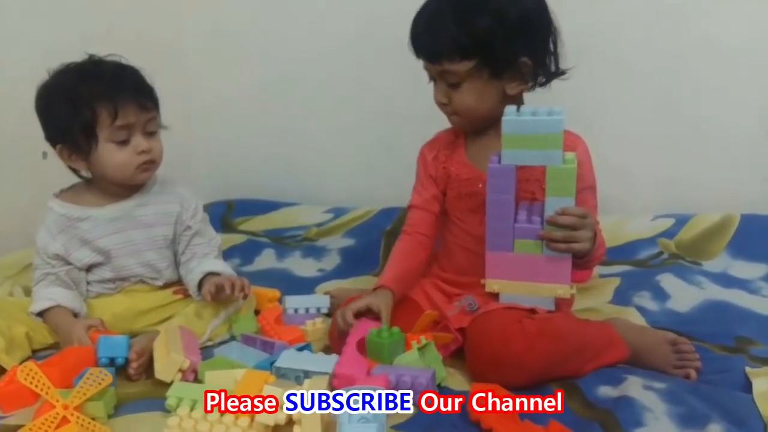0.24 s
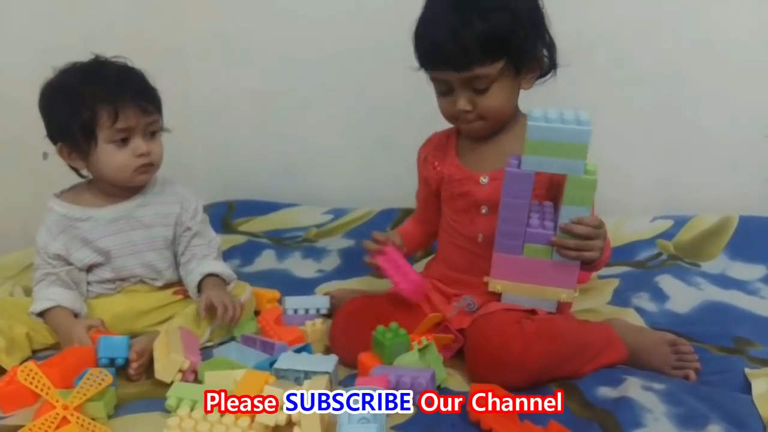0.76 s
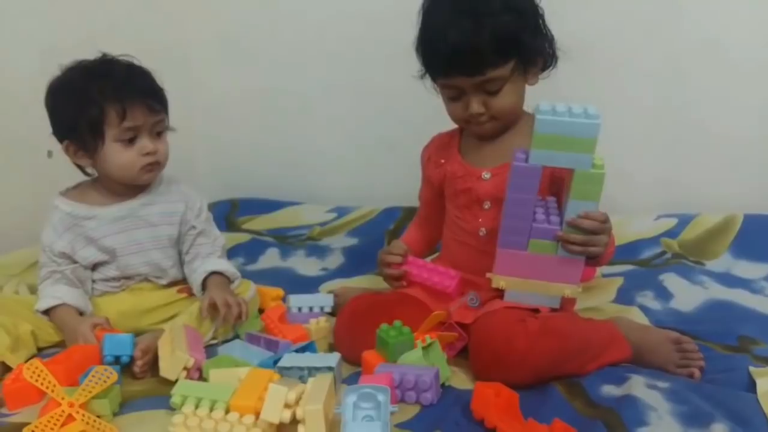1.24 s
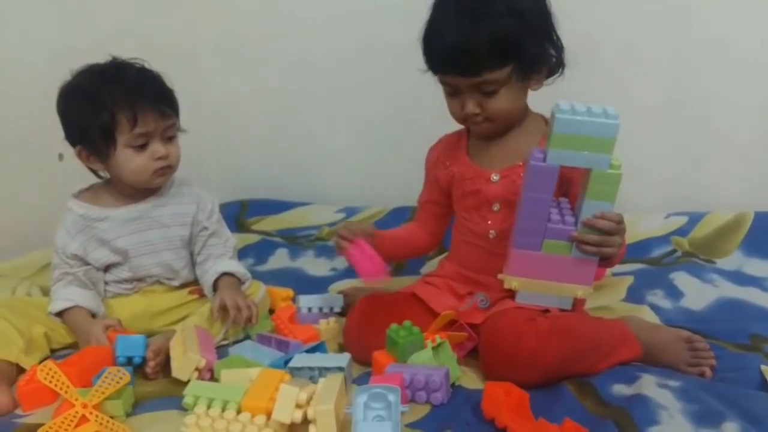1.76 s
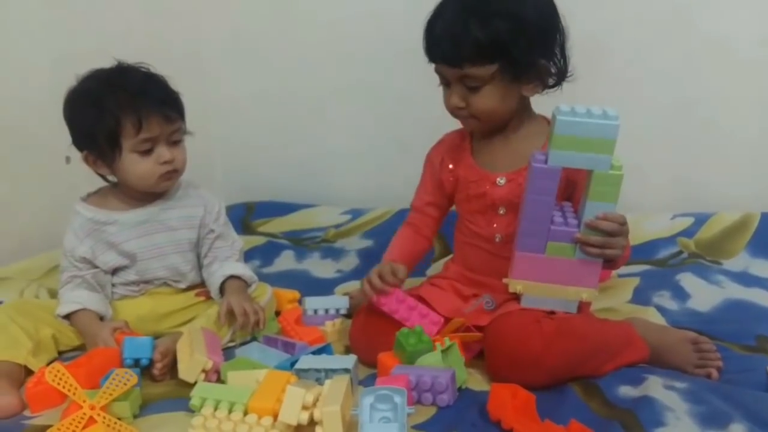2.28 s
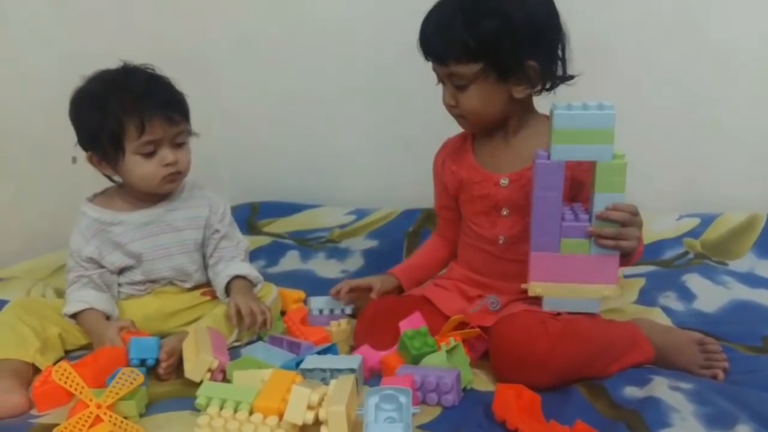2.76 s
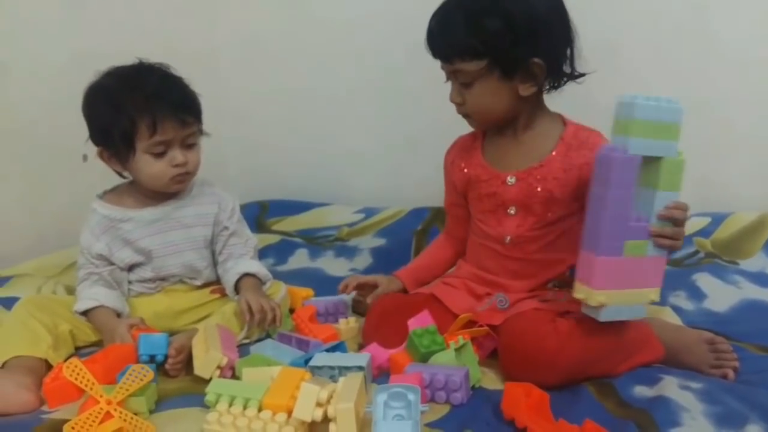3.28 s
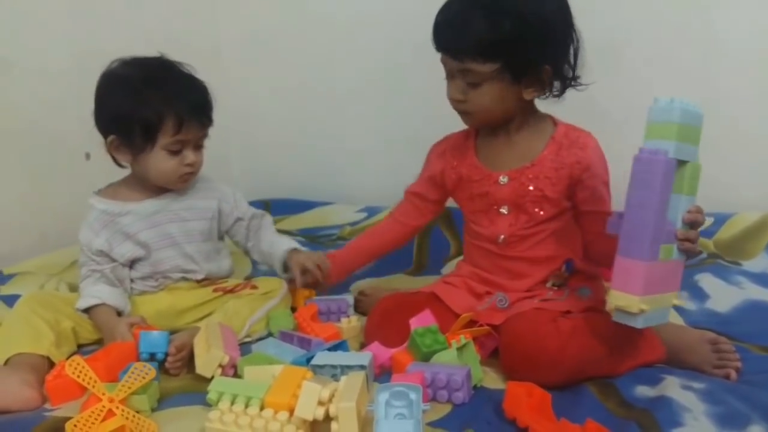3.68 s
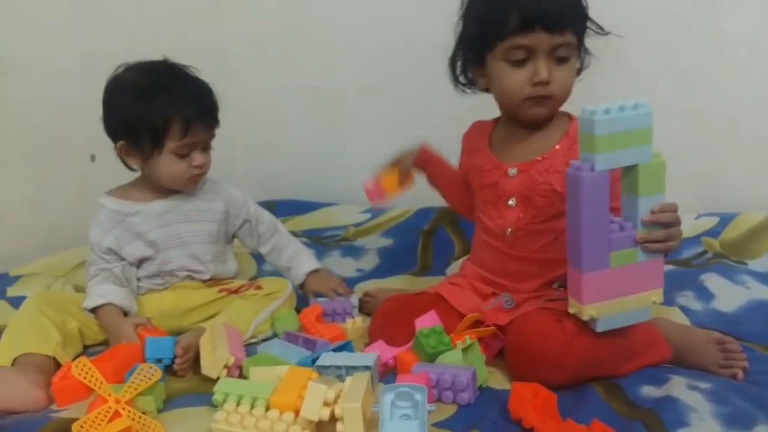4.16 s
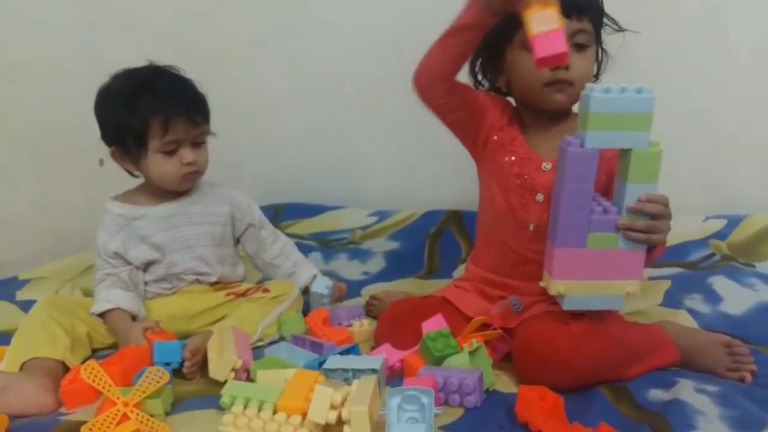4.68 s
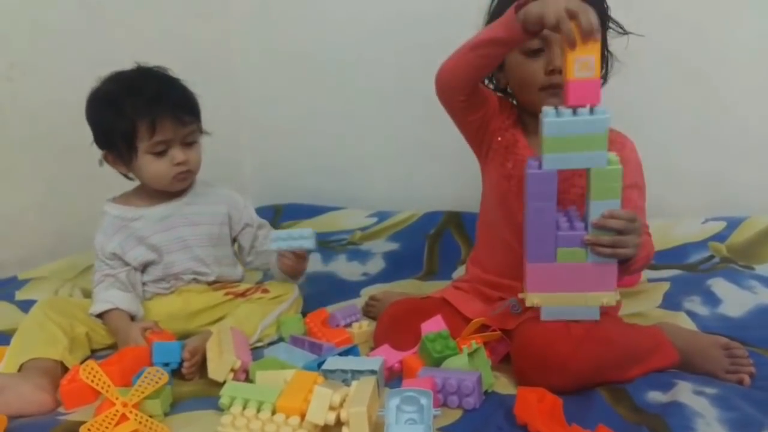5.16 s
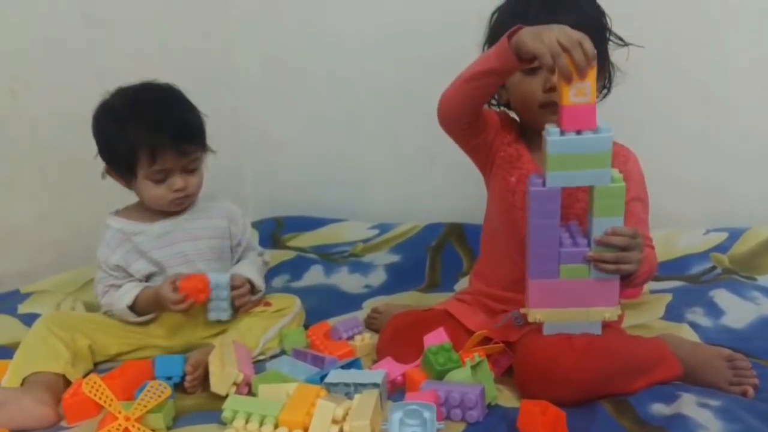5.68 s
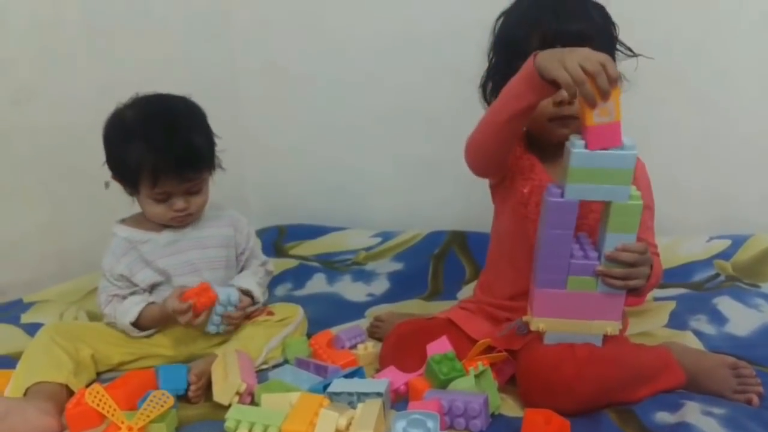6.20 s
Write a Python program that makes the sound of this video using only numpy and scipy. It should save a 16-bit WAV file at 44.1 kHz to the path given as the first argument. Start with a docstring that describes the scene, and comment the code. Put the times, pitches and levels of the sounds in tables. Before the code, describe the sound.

Large hollow toy bricks are handled on a bedspread. Light rattling grows into a dense, bright clatter, then one double clack, near silence with faint cloth, a strong hollow knock with low thud, scattered small clicks, a quieter lull, a sharp brick clack, and several snapping presses on a tower. The microphone is near; hard walls add a short bright tail over quiet room rumble and faint hiss.

```python
"""A low rumble, faint hiss and barely moving cloth come first; then a loose plastic block rattles.
A child handles large hollow blocks on a bed in a small, bare-walled room: an arch is dragged out
of the pile and dropped back, loose pieces clack, and a brick is pressed onto a tower.
Knocks and scrapes ring the blocks' walls, shaped noise makes rubbing cloth and sliding plastic,
and low, damped swings make the mattress thuds. Echoes and a fading tail add the room."""
import sys
import numpy as np
from scipy import signal
from scipy.fft import rfft, irfft
from scipy.io import wavfile

SR = 44100
rng = np.random.default_rng(int(sys.argv[2]) if len(sys.argv) > 2 else 0)


def generate_wav(sig):
    """Save sig (samples, or channels by samples) to the path in sys.argv[1] as 16-bit PCM at SR."""
    pcm = np.round(np.clip(np.atleast_2d(sig).T, -1, 1) * 32767).astype(np.int16)
    wavfile.write(sys.argv[1], SR, pcm)


N = 283563


def amp(db):
    """Turns decibels into a gain."""
    return 10 ** (np.asarray(db) / 20)


def unit(x):
    """Scales a signal to rms 1."""
    return x / np.sqrt(np.mean(x ** 2) + 1e-20)


def read(points, hz):
    """Reads a curve between its points, on a log-frequency axis."""
    f, value = np.transpose(points)
    return np.interp(np.log(hz + 1), np.log(f + 1), value)


def add(mix, s, sound):
    """Mixes a sound in at time s."""
    part = mix[:, max(round(s * SR), 0):][:, :sound.shape[-1]]
    part += sound[..., :part.shape[-1]]


# How alike left and right are in sound from all around: [f/Hz, likeness from 0 to 1]
LIKENESS = [(30, 0.54), (100, 1), (250, 0.52), (600, 0.42), (1200, 0), (2500, 0), (9000, 0)]


def matched(a, b, hz):
    """Blends two unrelated spectra so that long waves reach left and right more alike."""
    same = np.clip(read(LIKENESS, hz), -1, 1).reshape((-1,) + (1,) * (a.ndim - 1))
    return np.array([a, same * a + np.sqrt(1 - same ** 2) * b])


def coloured(pair, colour):
    """Gives two unrelated signals a tone colour and the likeness of sound from all around; rms 1."""
    hz = np.fft.rfftfreq(N, 1 / SR)
    left, right = rfft(pair)
    return unit(irfft(matched(left, right, hz) * amp(read(colour, hz)), N))


def slips(per_s, spread_db):
    """Makes tiny clicks of very uneven size, as surfaces stick and slip."""
    size = amp(spread_db * np.minimum(rng.exponential(1, N), 4))
    happens = rng.random(N) < per_s / SR
    return size * happens * rng.standard_normal((2, N))


def lumps(per_s, depth_db):
    """Makes a gain that wanders up and down as contacts come and go."""
    knots = np.arange(0, N + SR, SR / per_s)
    heights = np.clip(rng.standard_normal(len(knots)), -2, 2)
    return amp(depth_db * np.interp(np.arange(N), knots, heights))


def strokes(rows, rise_s, fall_s):
    """Adds up the gains of gestures; each swells, holds and fades."""
    t = np.arange(N) / SR
    total = np.zeros(N)
    for start, length, db in rows:
        before = np.maximum((start - t) / rise_s, 0)
        after = np.maximum((t - start - length) / fall_s, 0)
        total += amp(db - 20 * before - 20 * after)
    return total


# Tone colour of the hiss: [f/Hz, relative level/dB per Hz]
AIR_COLOUR = [(100, -22), (200, -6.5), (320, -8), (800, -11.5), (1200, -12.5), (1700, -14), (2300, -11),
              (3200, -37.5), (4000, -29), (5200, -48), (6400, -27), (9000, -38), (13000, -31), (15000, -41)]
# Tone colour of the rumble: [f/Hz, relative level/dB per Hz]
RUMBLE_COLOUR = [(20, -23), (30, -16), (45, -11.5), (60, -7.5), (85, 0.5), (130, 2), (200, -10), (300, -17),
                 (600, -45.5)]
AIR_DB, RUMBLE_DB = -68.5, -65  # rms before the microphone


def background():
    """Shaped noise makes a low, very slightly wavering rumble and a faint hiss."""
    rumble = coloured(rng.standard_normal((2, N)), RUMBLE_COLOUR)
    rumble *= amp(RUMBLE_DB) * lumps(per_s=8.4, depth_db=0.1)
    hiss = amp(AIR_DB) * coloured(rng.standard_normal((2, N)), AIR_COLOUR)
    return rumble + hiss


# Sleeves brush the blanket: [start t/s, length t/s, level/dB before the 8 dB cut in cloth()]
SLEEVES = [(.85, 0.14, -67.5), (1.52, 0.071, -59.5), (2.55, 0.4, -65), (4.01, 0.17, -69), (5.1, 2.6, -68)]
# Tone colour of rubbing cloth: [f/Hz, relative level/dB per Hz]
CLOTH_COLOUR = [(150, -8.5), (600, -3.5), (1500, 5.5), (2400, -1.5), (3400, -4), (4800, -29), (7000, -26),
                (13000, -51)]
SLEEVE_RISE_S, SLEEVE_FALL_S = 0.18, 0.049  # time to swell or fade by 20 dB
FIDGET_DB = -76.5  # cloth is never quite still


def cloth():
    """Fine grains of fabric rub in uneven strokes."""
    effort = amp(FIDGET_DB) + amp(-8) * strokes(SLEEVES, SLEEVE_RISE_S, SLEEVE_FALL_S)
    grains = lumps(per_s=29, depth_db=5.0) * slips(per_s=3000, spread_db=2.5)
    return effort * coloured(grains, CLOTH_COLOUR)


# Echoes from near walls: [delay t/s, gain; minus flips the wave]
ECHOES = [(.0031, -0.18), (.0058, 0.23), (.0092, 0.08), (0.014, 0.27), (0.0197, -0.2), (.027, 0.03)]
# Time for the room tail to fade by 60 dB: [f/Hz, fade t/s]
ROOM_FADE = [(120, 0.28), (400, 0.27), (1000, 0.42), (2200, 0.47), (5000, 0.52), (11000, 0.47)]
# Tone colour at the start of the tail: [f/Hz, relative level/dB]
ROOM_LEVEL = [(100, -22.5), (400, 0.5), (650, 3.5), (1200, -2.5), (2200, 0), (5000, 2), (11000, 3)]
ROOM_BUILD_S = .006  # time constant of the tail's build-up


def room(x, wet_db=0.23, count=3):
    """Near walls echo first, then scattered sound forms a tail that changes slowly over time."""
    out = np.zeros((2, N))
    for s, gain in ECHOES:
        add(out, s, gain * x)
    for k in range(count):
        # sparse random clicks stand for many scattered reflections
        taps = rng.choice([-1., 1.], (2, SR)) * (rng.random((2, SR)) < 4000 / SR)
        hz, t, z = signal.stft(taps, SR, nperseg=256)
        z = matched(z[0], z[1], hz)
        level_db = read(ROOM_LEVEL, hz)[:, None] - 60 * t / read(ROOM_FADE, hz)[:, None]
        tail = signal.istft(z * amp(level_db), SR, nperseg=256)[1]
        tail *= 1 - np.exp(-np.arange(tail.shape[1]) / SR / ROOM_BUILD_S)
        tail /= np.linalg.norm(tail, axis=1, keepdims=True)
        # each tail takes its turn; together their power stays even
        share = np.cos(np.pi * (np.arange(N) / SR + k / count)) * np.sqrt(2 / count)
        out += amp(wet_db) * signal.fftconvolve(x * share, tail, axes=1)[:, :N]
    return out


# Ringing tones of each piece or part that is struck, by name: [f/Hz, width f/Hz, level/dB].
# "edge" is a thin wall that catches, "snap" a dead click between gripped parts,
# "seat" a brick bottoming on its studs.
PIECES = { "arch": [(1293, 76, -2), (1570, 73, -0.5), (2270, 70, 3.5), (3320, 88, -15), (3790, 66, -12.5),
          (4300, 89, -11)], "pile": [(132, 42, -9), (246, 92, -3.5), (590, 210, 2.5), (895, 170, -5),
          (1425, 230, 4.5), (2110, 320, -10), (2730, 120, -14)], "loose": [(960, 170, -1), (1500, 200, 6.5),
          (1610, 550, 1.5), (2134, 215, -7), (3450, 230, -13)], "small": [(1574, 110, 1.5),
          (1647, 110, -0.5), (2283, 86, -4), (3435, 180, -14)], "brick": [(1150, 83, -10), (1502, 38, -2),
          (1690, 50, 4), (1771, 35, 4.5), (2042, 88, 0.5), (2338, 37, -1.5), (2620, 90, -11),
          (2874, 77, -9.5), (3560, 230, -22)], "hollow": [(228, 30, -9), (370, 60, -11), (467, 42, 1),
          (560, 32, 3), (700, 60, -16), (846, 35, -2), (937, 35, -7), (1033, 40, -3), (1362, 50, -5),
          (1723, 35, -9)], "rim": [(1390, 300, -13), (2140, 80, -6), (2324, 76, -5.5), (2530, 31, -8.5),
          (2820, 44, -15), (3240, 90, -12.5), (3660, 200, -22), (11160, 1200, -9)],
          "flat": [(1100, 410, -5.5), (1495, 330, 1.5), (1720, 330, 3), (2200, 220, 0.5), (3550, 500, -17)],
          "edge": [(1450, 260, -11), (1880, 180, -1), (2080, 120, 1), (2377, 116, -0.5), (3930, 300, -9)],
          "snap": [(1150, 300, -16.5), (1760, 350, 3), (2470, 350, -13)], "seat": [(1190, 65, -7),
          (1878, 61, 8.5), (2245, 68, 3), (2493, 45, 0.5), (2956, 84, -2.5), (3790, 81, -8),
          (4100, 100, -14)], "stud": [(2330, 230, -6.5), (3730, 260, -8), (3990, 290, -1)],
          "tower": [(2050, 160, 6.5), (2100, 46, 1), (2325, 120, 5.5), (2880, 112, -6), (3330, 180, -7.5),
          (5100, 220, -39)]}
# How the force of a knock is spread over pitch: [f/Hz, level/dB]
CONTACT = [(40, -15.5), (110, 3.5), (300, -1), (1500, 2.5), (2400, 2.5), (3200, 0), (4200, -7),
           (5400, -13.5), (7000, -13), (10800, -32.5), (12500, -46), (15000, -70.5)]
# Share of a knock that comes from edges chattering: [f/Hz, level/dB]
CHATTER = [(100, -10), (1000, -5.5), (2400, -2.5), (3300, -0.5), (4500, -0.5), (14000, -0.5)]
# Extra delay at the right microphone port, by piece: [delay t/ms]
RIGHT_LATE_MS = {"arch": 0.029, "pile": 0.054, "loose": 0.14, "small": 0.11, "brick": 0.097, "hollow":
                 0.024, "rim": 0.037, "flat": 0.13, "stud": 0.031, "tower": 0.17, "edge": 0.048, "snap":
                 0.059, "seat": 0.15}


def knock(piece, peak_db, factor, bright_db, pan_db, skirt=1.27, shell_db=-29, chatter_s=0.006,
          size=8192):
    """A brief contact rings the walls of one hollow piece, with its own level and brightness."""
    hz = np.maximum(np.fft.rfftfreq(size, 1 / SR), 1)
    t = np.arange(size) / SR
    power = amp(shell_db) ** 2  # a faint even floor under the ringing tones
    for f, width, db in PIECES[piece]:
        off_pitch = (hz - (f * factor) ** 2 / hz) / width
        power = power + amp(db) ** 2 / (1 + off_pitch ** 2) ** skirt
    octaves = np.log2(np.clip(hz, 300, 5000) / 2000)
    gain = np.sqrt(power) * amp(read(CONTACT, hz) + bright_db * octaves)
    # this phase puts the energy first: sharp start, dying tail
    log_gain = np.log(np.r_[gain, gain[-2:0:-1]] + 1e-6)
    ring = np.exp(np.conj(signal.hilbert(log_gain)))[:len(hz)]
    # the peak is set before chatter, left-right balance, room and microphone
    ring *= amp(peak_db) / abs(signal.hilbert(irfft(ring))).max()
    # the edges chatter for a few milliseconds, which spreads the treble out in time
    chatter = rng.standard_normal((2, size)) * np.exp(-t / chatter_s)
    chatter = rfft(chatter / np.linalg.norm(chatter, axis=1, keepdims=True))
    share = np.clip(amp(read(CHATTER, hz)), 0, 1)
    delay = np.array([[0], [RIGHT_LATE_MS[piece]]]) / 1000
    clean = np.sqrt(1 - share ** 2) * np.exp(-2j * np.pi * hz * delay)
    sound = irfft(ring * (clean + share * chatter))[:, :size // 2]
    return sound * amp([[pan_db / 2], [-pan_db / 2]])


# A jostled piece rattles in a quick run of contacts:
# [start t/s, length t/s, piece, first level/dB before chance, pitch factor, brightness/dB per octave]
RATTLES = [(0.048, 0.098, "loose", -47.5, 0.94, -5), (0.233, 0.064, "loose", -44.5, 0.74, -1),
           (2.136, 0.052, "flat", -38, 1.67, 1), (4.415, 0.061, "flat", -39, 1.1, 1.5),
           (4.8, 0.05, "stud", -40.5, 0.82, -1.5)]
RATTLE_FADE_DB, RATTLE_SPREAD_DB = -4, 4  # fade over a full run, chance in each contact
RATTLE_DETUNE, RATTLE_PAN_DB = 0.033, 8.5  # each contact lands on another spot of the piece


def rattles(count=4, jitter=.25):
    """Each rattle is a few unevenly spaced contacts that tend to grow weaker."""
    out = np.zeros((2, N))
    for start, length, piece, peak_db, factor, bright_db in RATTLES:
        for k in range(count):
            late, force, spot, side = np.clip(rng.standard_normal(4), -1.5, 1.5)
            along = (k + jitter * late * (k > 0)) / count
            db = peak_db + RATTLE_FADE_DB * along + RATTLE_SPREAD_DB * force
            pitch = factor * (1 + RATTLE_DETUNE * spot)
            add(out, start + length * along, knock(piece, db, pitch, bright_db, RATTLE_PAN_DB * side))
    return out


# Weight shifts on the bedding: [start t/s, length t/s, level/dB]
SHIFTS = [(.1, 0.55, -67), (1.25, 0.32, -71), (1.85, 0.41, -65), (2.4, 0.33, -64), (2.71, 0.038, -61),
          (3.16, 0.08, -62), (4.4, 0.57, -71), (5.11, 0.085, -58), (5.73, 0.014, -56.5), (5.9, 0.44, -65.5)]
# Tone colour of the bedding: [f/Hz, relative level/dB per Hz]
SHIFT_COLOUR = [(40, -20), (90, 5.5), (140, 2.5), (230, -4.5), (330, -10), (550, -17.5), (900, -24.5),
                (2000, -52), (6000, -72)]
SHIFT_RISE_S, SHIFT_FALL_S = 0.05, 0.2  # time to swell or fade by 20 dB


def bedding():
    """The mattress rustles dully, in tiny slips, under moving knees and arms."""
    effort = strokes(SHIFTS, SHIFT_RISE_S, SHIFT_FALL_S)
    return effort * coloured(slips(per_s=600, spread_db=2.0), SHIFT_COLOUR)


# Knocks that stand out, from dragging the arch to pressing the brick on:
# [t/s, piece, peak level/dB as set in knock(), pitch factor, brightness/dB per octave, left-right/dB]
KNOCKS = [ (0.1249, "loose", -40, 0.97, 4, 12), (.216, "loose", -37, 1.02, -4.5, -3),
          (0.2253, "loose", -34, 0.96, -7, 4), (0.2527, "arch", -39, 0.99, -2.5, -5),
          (0.3445, "edge", -31, 1.1, 5, -2), (.353, "edge", -33, 0.91, 9, 0),
          (.3585, "edge", -34.5, 1.02, 6, -3), (0.3621, "edge", -29, 1.14, 3, 1),
          (.376, "stud", -29.5, 0.93, -2, 5), (.3765, "flat", -32, 0.71, 3.5, 1),
          (.384, "edge", -29, 0.92, 1, 2), (0.3922, "edge", -30.5, 1.12, 3.5, 6),
          (.3975, "edge", -35, 0.95, 2, 0), (.409, "edge", -36, 1.03, 4, 1),
          (0.4237, "edge", -35, 1.2, 3, 0), (0.4293, "edge", -31.5, 1, 8, 5),
          (.446, "flat", -34, 1.05, -3.5, -2), (.457, "flat", -26, 1.08, 5, 4),
          (0.465, "edge", -32, 1, -1, -2), (0.4829, "snap", -28.5, 0.91, 4, -2),
          (.4965, "edge", -37, 1, 0, 0), (0.5059, "flat", -31, 0.85, 5, 4),
          (0.5231, "edge", -34, 1.05, -2.5, 2), (.53, "snap", -45, 0.88, -3, 0),
          (0.5443, "snap", -26.5, 0.88, -1.5, 0), (0.5522, "arch", -21.5, 1.02, -2, 4),
          (0.5565, "snap", -31, 0.81, -1, -1), (0.5602, "arch", -23.5, 1.01, -2.5, 0),
          (0.5979, "snap", -32.5, 0.84, 3.5, 2), (0.6313, "flat", -41, 0.61, 0.5, 1),
          (1.1343, "flat", -27, 0.98, -2.5, -1.5), (1.1347, "snap", -31, 0.96, -1.5, 0),
          (1.161, "snap", -39, 1.1, -1, 1), (1.303, "small", -55, 1.1, 3, 1),
          (1.348, "small", -56, 1.13, 1, -1), (1.429, "small", -52, 1.06, 0, -3),
          (1.5136, "stud", -53, 0.88, 4, 7), (1.5667, "flat", -49, 1.15, 8, 4),
          (1.602, "stud", -53, 0.83, 5, 4), (2.122, "pile", -21, 1.04, 3.5, 0.5),
          (2.1271, "pile", -24.5, 0.83, 1, 1), (2.132, "rim", -19.5, 1.01, 1, 1),
          (2.1324, "snap", -20, 1.22, 1, -1.5), (2.1332, "hollow", -22, 0.99, 0.5, 2.5),
          (2.1337, "pile", -26, 1.03, 2, 2), (2.1362, "stud", -27.5, 0.8, -4, 2),
          (2.146, "edge", -37, 1.4, -2, 2), (2.169, "edge", -35, 1.1, 3, 2),
          (2.184, "edge", -38, 1.1, 7, 0), (2.2292, "snap", -35.5, 0.9, 4, -3),
          (2.2453, "snap", -29, 0.72, 2.5, 1), (2.3362, "snap", -36, 0.88, 6.5, 0),
          (2.3366, "stud", -33.5, 0.97, -5.5, 1), (2.35, "snap", -34, 0.87, 5.5, 1),
          (2.3504, "rim", -34, 1.04, -1.5, 3), (2.3838, "snap", -41, 0.76, 2, 0),
          (2.401, "snap", -32, 0.72, -0.5, 4), (2.4097, "snap", -34, 0.75, -2, 2),
          (2.4252, "snap", -29, 0.86, 1, -0.5), (2.57, "loose", -43, 0.74, 11.5, -2),
          (2.624, "rim", -32, 1.12, -3.5, 4), (2.685, "small", -36.5, 0.79, 10, -1),
          (2.696, "loose", -30.5, 0.99, 7, 1), (2.7087, "loose", -28, 0.62, 3, 0.5),
          (2.7094, "pile", -37, 0.88, -7, 0), (2.787, "loose", -32, 0.94, 4, 0),
          (2.8067, "flat", -37.5, 1.03, -1, -1), (2.809, "rim", -40, 0.97, 0, 0),
          (2.932, "edge", -51, 1, -1, 0), (2.944, "edge", -46.5, 1.08, 1, 0),
          (3.157, "pile", -40, 1.01, -6, 2), (3.1667, "flat", -38, 0.95, 1.5, -1),
          (3.179, "flat", -35.5, 0.97, -1, 2.5), (3.204, "flat", -42, 1.06, 2, -4),
          (3.216, "flat", -33, 0.99, 1.5, -0.5), (3.233, "flat", -40, 0.96, 3, 4),
          (3.243, "rim", -46, 0.97, -2.5, 0), (3.257, "flat", -44, 0.97, 0, 2),
          (3.27, "small", -42.5, 1.01, 0.5, 0), (3.305, "small", -50.5, 1, 1, 0),
          (3.9972, "flat", -48, 0.8, 1.5, -2), (4.034, "flat", -52, 1.1, -6, -3),
          (4.081, "flat", -53, 1, 3, 3), (4.14, "flat", -53, 1.1, 9, -1),
          (4.376, "small", -43, 0.91, 3.5, 0), (4.405, "small", -30.5, 0.998, -2.5, 0.5),
          (4.407, "flat", -43, 1.25, -0.5, -4), (4.701, "snap", -36.5, 0.89, -5.5, 0),
          (4.7065, "snap", -34, 1.15, 2.5, -1), (4.7315, "edge", -34, 1, 2, -2),
          (4.7365, "snap", -29, 1.2, -2, 0), (4.756, "loose", -29, 0.51, 3, 0.5),
          (4.758, "snap", -27.5, 1.15, 0.5, 0), (4.762, "snap", -29, 1.2, 2.5, -1),
          (4.7815, "brick", -20, 1.005, 4, 4), (4.783, "snap", -21, 0.98, 5.5, -1.5),
          (4.7835, "stud", -27.5, 0.8, -2.5, 1), (4.7883, "brick", -27, 0.9, 2.5, 1),
          (4.7956, "brick", -23, 1.02, 3, 2), (4.809, "edge", -25.5, 1.1, 2, 0),
          (4.8184, "brick", -25, 1.02, 5, -3), (4.8325, "snap", -28, 1.01, 2.5, 3),
          (5.2824, "flat", -27, 1.1, 1.5, 0.5), (5.2835, "loose", -26.5, 0.73, 0.5, 2),
          (5.2902, "edge", -27, 0.93, -2, -1.5), (5.372, "snap", -35, 1.13, -1, 0),
          (5.3747, "snap", -25, 1.01, -1, 0), (5.385, "small", -39.5, 1.12, 7, 2),
          (5.396, "brick", -34, 1.06, 3.5, 2), (5.397, "stud", -37, 0.82, 0, 3),
          (5.6452, "tower", -29, 1.1, 2.5, -9), (5.6455, "stud", -30.5, 0.76, -1.5, -3),
          (5.6478, "tower", -23, 0.98, 0.5, 6), (5.65, "snap", -19.5, 1.24, -0.5, 2),
          (5.663, "snap", -26.5, 1.08, -2, -3), (5.669, "tower", -24.5, 0.88, -2, -2),
          (5.7305, "snap", -38, 1.2, -1, -4), (5.7566, "snap", -32.5, 1.14, 0.5, -2),
          (5.8312, "seat", -26, 1.09, 6.5, 6), (5.833, "flat", -30.5, 0.6, 8.5, 0),
          (5.851, "stud", -31.5, 1.08, -3, 0), (5.855, "seat", -24.5, 1, -1.5, -4.5),
          (5.868, "flat", -31, 1.08, 0.5, 0), (5.88, "seat", -30, 1, -2, -4),
          (5.891, "flat", -30, 0.88, 7, 1), (5.8947, "snap", -33, 1.1, 1, 0),
          (5.9174, "snap", -34, 1.13, -1, -3), (5.976, "loose", -38, 0.76, 3, 4.5),
          (6.0226, "flat", -38, 1.1, -0.5, 1), (6.1392, "flat", -43, 0.93, 8, -1)]
# How freely each piece sounds toward the walls; pile and hands shield some, by piece: [level/dB]
TO_WALLS_DB = {"arch": -5.5, "pile": -2.5, "loose": -1, "small": 0.5, "brick": 0, "hollow": -1.5, "rim": 0,
               "flat": 0.5, "stud": -2.5, "tower": -1, "edge": -2.5, "snap": -1, "seat": -1}


def blocks():
    """Plastic knocks on plastic; one mix goes straight to the microphone, one reaches the walls."""
    direct, to_walls = np.zeros((2, 2, N))
    for s, piece, *blow in KNOCKS:
        sound = knock(piece, *blow)
        add(direct, s, sound)
        add(to_walls, s, amp(TO_WALLS_DB[piece]) * sound)
    return direct, to_walls


# Pieces slide on one another: [start t/s, length t/s, level/dB]
SLIDES = [(.125, 0.028, -55), (.23, 0.053, -58), (.355, 0.062, -49), (.45, 0.022, -47.5),
          (.485, 0.045, -51), (.77, 0.02, -66.5), (3.215, 0.072, -63), (4.63, 0.06, -61),
          (4.72, 0.084, -51), (5.7, 0.088, -55.5), (5.85, 0.045, -56.5), (5.99, 0.082, -61.5)]
# Tone colour of sliding plastic: [f/Hz, relative level/dB per Hz]
SLIDE_COLOUR = [(100, -44), (250, -18), (550, -10), (1000, -9.5), (1400, -1), (2100, 1.5), (2420, -1),
                (2800, -13), (3800, -14), (5300, -32.5), (7000, -29.5), (11000, -38.5), (12500, -63),
                (15000, -58)]
SLIDE_RISE_S, SLIDE_FALL_S = 0.048, 0.053  # time to swell or fade by 20 dB


def sliding():
    """Studs and edges catch and slip in short runs as pieces rub."""
    effort = strokes(SLIDES, SLIDE_RISE_S, SLIDE_FALL_S)
    grains = lumps(per_s=130, depth_db=3.5) * slips(per_s=1100, spread_db=1)
    return effort * coloured(grains, SLIDE_COLOUR)


# A stud or fingertip scrapes along a wall and its pitch shifts with the grip:
# [start t/s, length t/s, rms level/dB, first f/Hz, last f/Hz]
SCRAPES = [(0.331, 0.095, -48.5, 2000, 2300), (0.347, 0.072, -58, 3820, 4250),
           (0.566, 0.014, -41, 2340, 2280), (1.425, 0.068, -70, 1710, 1730),
           (1.864, 0.049, -74, 1750, 1760), (3.222, 0.017, -69, 3470, 3740),
           (3.234, .04, -54.5, 2100, 1990), (5.724, 0.03, -63.5, 563, 443),
           (5.751, 0.0084, -51, 3550, 4300), (6.004, 0.014, -61.5, 420, 680)]
SCRAPE_WIDTH, SCRAPE_RATE = 0.11, 1100  # damping as a share of the first pitch; slips per second
SCRAPE_ROOM_DB = -10.5  # the cupped hand shields a scrape from the walls


def scrapes(spread_db=2.0):
    """Quick uneven slips ring one wall tone that glides while the stud moves."""
    out = np.zeros((2, N))
    for start, length, db, first_hz, last_hz in SCRAPES:
        along = np.arange(round(length * SR)) / (length * SR)
        pitch = first_hz + (last_hz - first_hz) * along
        turn = np.exp(2j * np.pi * np.cumsum(pitch) / SR)
        drive = slips(per_s=SCRAPE_RATE, spread_db=spread_db)
        drive = (drive + 0.056 * rng.standard_normal((2, N)))[:, :len(along)]
        # shift the pitch down to zero, let it ring there, then shift it back
        r = np.exp(-np.pi * SCRAPE_WIDTH * first_hz / SR)
        ring = (turn * signal.lfilter([1], [1, -2 * r, r * r], drive / turn)).real
        add(out, start, amp(db) * unit(ring * np.sqrt(np.sin(np.pi * along))))
    return out


# Blows on the mattress:
# [t/s, starting level/dB before the soft onset and bass cut, f/Hz, time to fade 60 dB t/s]
THUDS = [(2.13, -33.5, 119, 0.095), (2.132, -42.5, 224, 0.11), (2.7106, -15, 146, 0.02),
         (2.765, -34.5, 113, 0.051), (4.372, -48, 163, 0.051), (4.785, -40, 256, 0.04),
         (5.128, -47, 144, 0.092), (5.728, -48.5, 206, 0.083)]


def mattress(rise_s=0.0025):
    """Each blow on the bed gives a few low, damped swings."""
    out = np.zeros((2, N))
    t = np.arange(SR // 4) / SR
    for s, start_db, hz, t60 in THUDS:
        level = amp(start_db - 60 * t / t60) * (1 - np.exp(-t / rise_s))
        add(out, s, level * np.sin(2 * np.pi * hz * t))
    return signal.sosfilt(signal.butter(3, 75, "high", fs=SR, output="sos"), out)


# Different tone colours of the two microphone ports: [f/Hz, left-right level/dB]
PORTS = [(100, 0), (600, -1.4), (1400, -4.2), (2400, -2.2), (3400, 3), (5000, 8), (9000, 5), (13000, -2)]


def scene():
    """The toys and bed sound in the room; two microphone ports hear them in different colours."""
    knocks, knocks_to_walls = blocks()
    near = cloth() + rattles() + bedding() + sliding() + mattress()
    held = scrapes()
    reverb = room(knocks_to_walls + near + amp(SCRAPE_ROOM_DB) * held)
    side_db = read(PORTS, np.fft.rfftfreq(N, 1 / SR)) / 2
    toys = irfft(rfft(knocks + near + held + reverb) * amp([side_db, -side_db]), N)
    return background() + toys


# Tone colour of the microphone: [f/Hz, level/dB]
MICROPHONE = [(20, 7.5), (60, 0), (9000, -0.5), (11000, -2.5), (12200, -7.5), (14400, -12.5)]
EDGE_HZ = 14400  # upper limit of the recorder


def record(dry):
    """The microphone colours the sound, then the recorder cuts the highest treble."""
    heard = irfft(rfft(dry) * amp(read(MICROPHONE, np.fft.rfftfreq(N, 1 / SR))), N)
    band_limit = signal.firwin(255, EDGE_HZ, window=("kaiser", 8), fs=SR)
    return signal.oaconvolve(heard, band_limit[None], "same", axes=1)


dry = scene()
out = record(dry)
generate_wav(out)
```